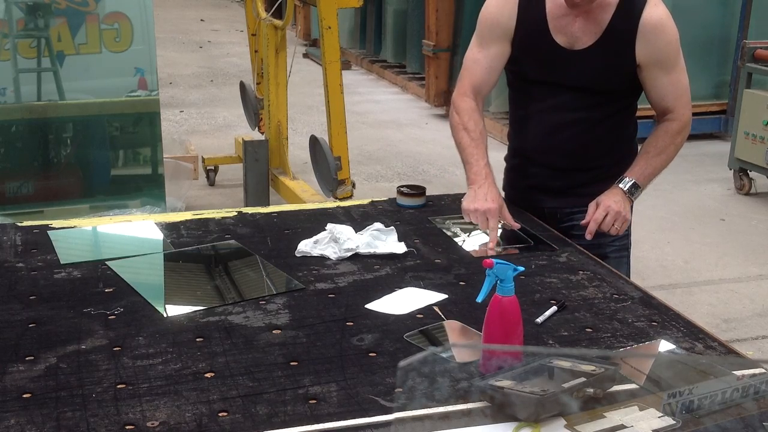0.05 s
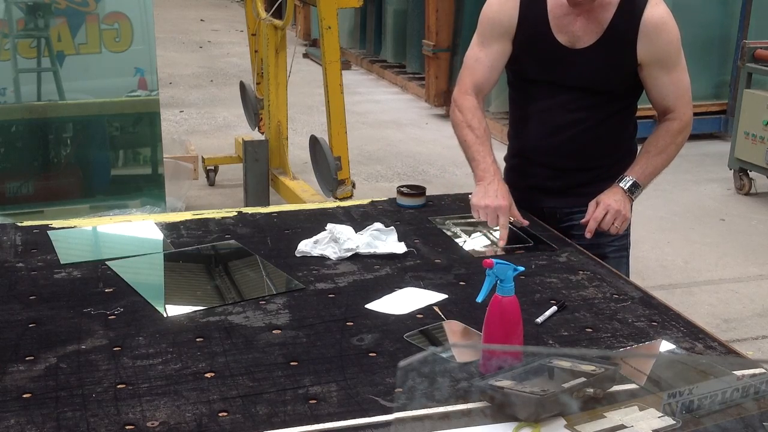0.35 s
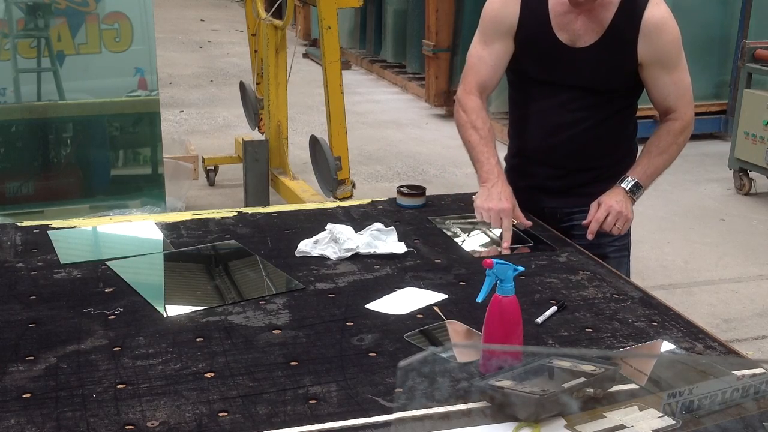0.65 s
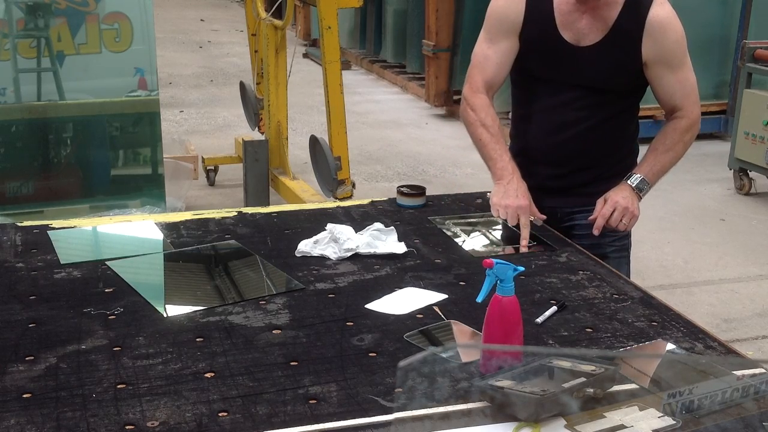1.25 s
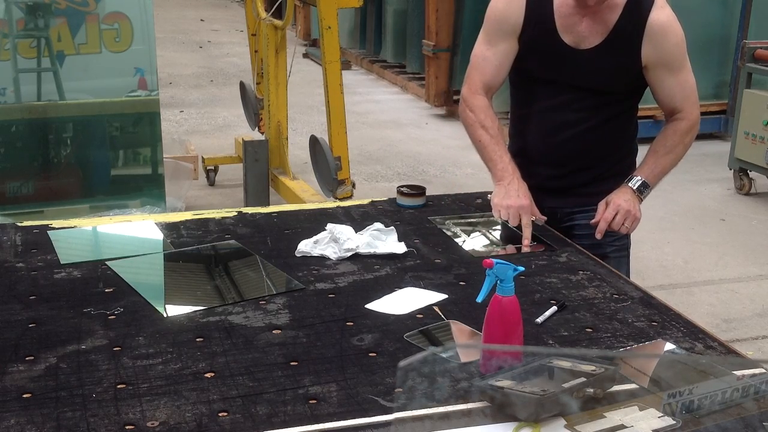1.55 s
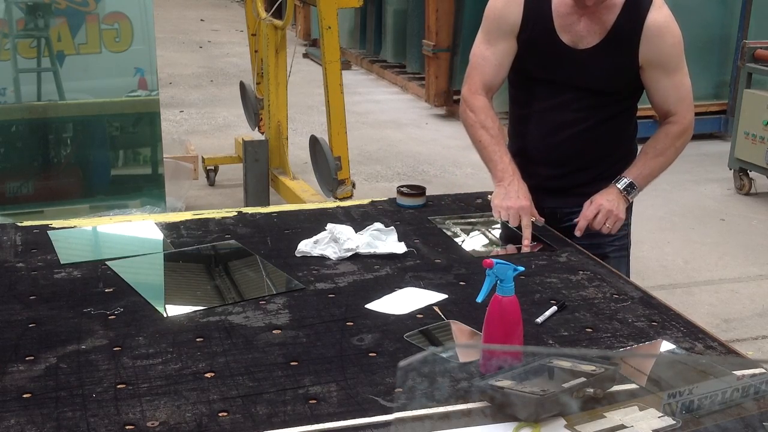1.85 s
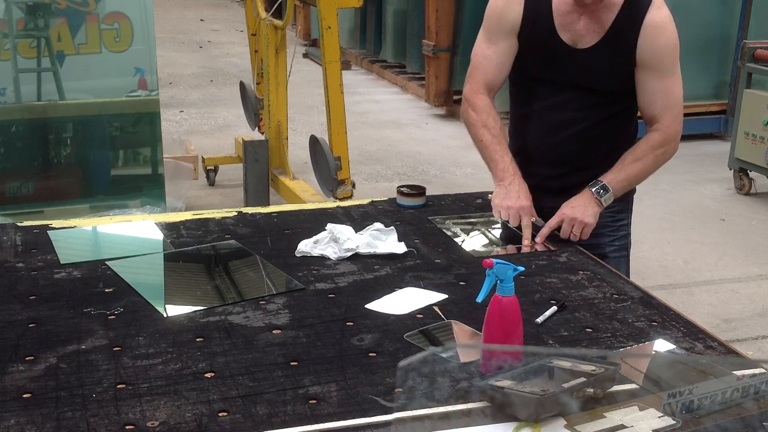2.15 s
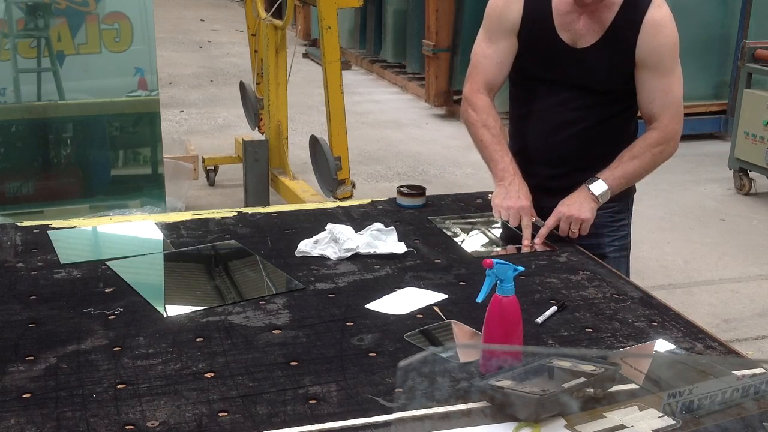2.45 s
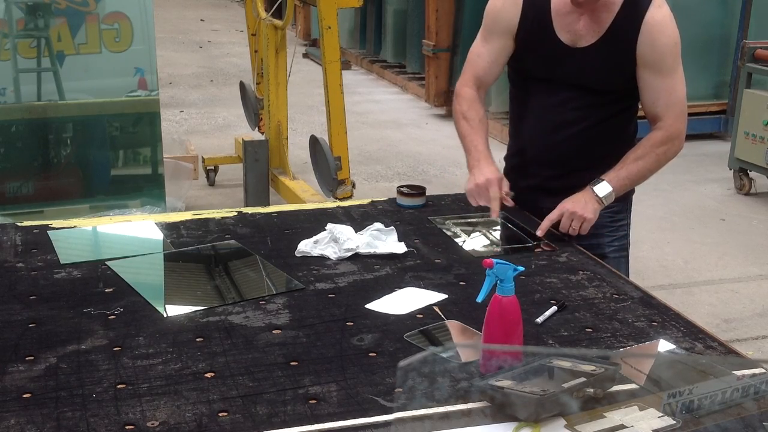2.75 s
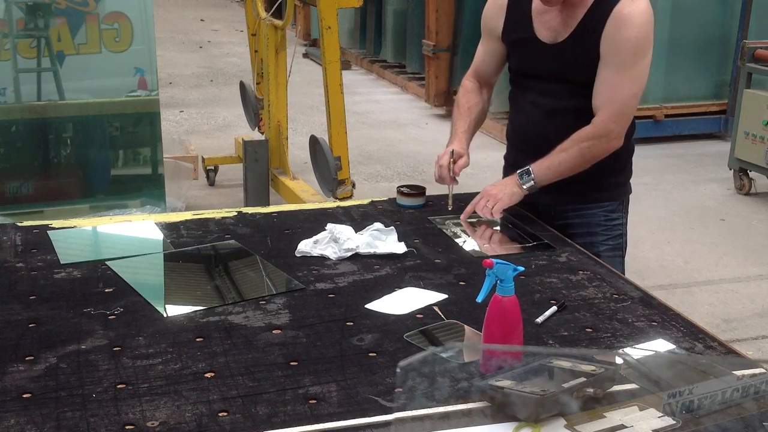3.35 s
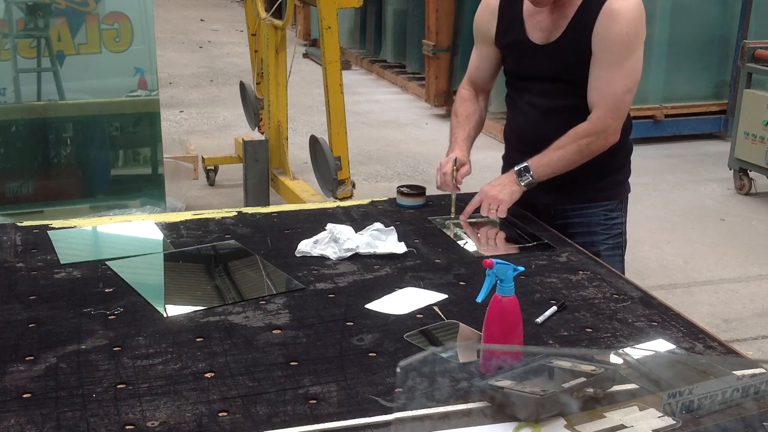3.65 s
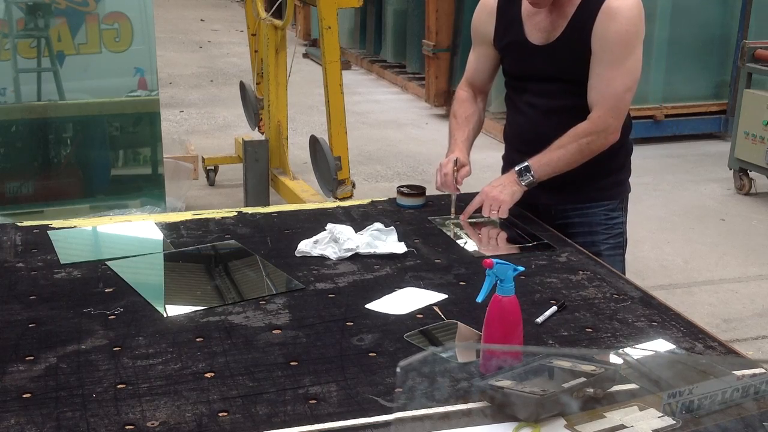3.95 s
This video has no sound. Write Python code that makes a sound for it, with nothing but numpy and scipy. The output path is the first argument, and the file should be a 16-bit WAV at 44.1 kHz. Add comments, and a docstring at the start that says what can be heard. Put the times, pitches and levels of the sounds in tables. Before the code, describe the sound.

Mirror glass snaps along its score, squeaks, then a sharp knock, in a humming workshop.

```python
"""A large, humming workshop: a scored mirror snaps on a padded bench.
Fingers tick on the glass and scrape it over grit. The crack rings the cloth-damped sheet and thumps
the bench; the freed strip squeals thinly as its edge rubs away. The steel cutter is set down, then
knocks. The hall answers each sound, over ventilation and two far motors."""
import sys
import numpy as np
from scipy import signal
from scipy.fft import rfft, irfft
from scipy.io import wavfile

SR = 44100
rng = np.random.default_rng(int(sys.argv[2]) if len(sys.argv) > 2 else 0)


def master_out(mix):
    """Clip the mix to full scale and print it as 16-bit PCM to the path in sys.argv[1]."""
    frames = np.transpose(np.atleast_2d(mix))
    ceiling = np.clip(frames, -1, 1)
    pcm = np.round(ceiling * 32767).astype(np.int16)
    wavfile.write(sys.argv[1], SR, pcm)


N = 176400


def undb(db):
    """Decibels to gain."""
    return 10 ** (np.asarray(db) / 20)


def unit_rms(x):
    """Scale to rms 1."""
    return x / np.sqrt(np.mean(x ** 2))


def decay(t, t60_s):
    """Exponential decay, 60 dB in t60_s."""
    return np.exp(-np.log(1000) * t / t60_s)


def at_hz(hz, table, column=1):
    """Table column interpolated over log frequency."""
    table = np.array(table)
    return np.interp(np.log(np.maximum(hz, 1)), np.log(table[:, 0]), table[:, column])


def noise(gain, size=N):
    """Noise of rms 1 with spectrum gain(Hz)."""
    f = np.fft.rfftfreq(size, 1 / SR)
    return unit_rms(irfft(rfft(rng.standard_normal(size)) * gain(f), size))


def drift(rate_hz):
    """Smooth random drift, rms 1."""
    return noise(lambda f: np.exp(-(f / rate_hz) ** 2) * (f > 0))


def bands(x, count=20):
    """Overlapping (centre Hz, band) pairs that sum to x."""
    centres_hz = np.geomspace(60, 16000, count)
    spectrum, f = rfft(x), np.fft.rfftfreq(len(x), 1 / SR)
    return [(hz, irfft(spectrum * at_hz(f, np.c_[centres_hz, weights]), len(x)))
            for hz, weights in zip(centres_hz, np.eye(count))]


def add(out, start_s, x):
    """Mix x into out at start_s."""
    i = int(start_s * SR)
    out[i:i + len(x)] += x[:N - i]


# air and machinery spectrum (frequency [Hz], relative density [dB])
AIR_SPECTRUM = [(18, -87), (30, -71), (59, -29.5), (92, -26), (113, -15.5), (132, -7.5), (154, -3),
                (171, -7), (185, -2), (205, -1), (234, 0.5), (253, -13), (281, -7), (364, -8.5),
                (437, -4.5), (511, -10), (662, -9), (815, -8.5), (928, -12), (1140, -15.5), (1370, -20),
                (1600, -18.5), (3070, -33), (8690, -37), (15000, -39)]
# drone resonances (frequency [Hz], half-width [Hz], mean level [dB])
DRONE_PEAKS = [(224.3, 7.3, -63.5), (294.3, 9.4, -69.5), (450.5, 14.6, -57), (657.5, 7.4, -61.5),
               (794, 24, -63.5)]
def ventilation(air_db=-49, split_hz=2000, rise_db_per_s=0.5):
    """Flickering air and a resonant drone swell slowly under steady hiss."""
    t = np.arange(N) / SR
    air_gain = lambda f: undb(at_hz(f, AIR_SPECTRUM))
    rush = sum(band * undb(0.5 * drift(30)) for hz, band in bands(noise(air_gain)) if hz < split_hz)
    hiss = sum(band for hz, band in bands(noise(air_gain)) if hz >= split_hz)
    drone = sum(undb(db) * noise(lambda f: 1 / (1 + ((f - hz) / width_hz) ** 2))
                for hz, width_hz, db in DRONE_PEAKS)
    swell = undb(-1.12 * drift(1.0) + rise_db_per_s * (t - t.mean()))
    return swell * (undb(air_db) * rush + drone) + undb(air_db) * hiss


# motor hum tracks (time [s], frequency [Hz], rms level [dB])
LOW_HUM = [(0, 145, -58), (1.1, 143, -60), (1.6, 142.9, -88), (2.0, 146, -58), (2.8, 146.1, -57.5),
           (3.17, 147.5, -61.5), (3.3, 145, -51), (3.65, 147, -48.5), (3.8, 148.2, -60),
           (3.92, 148.5, -46.5)]
HIGH_HUM = [(0, 199, -76), (.6, 196, -58.5), (1.2, 202.3, -84), (1.8, 205.2, -52.5), (2.25, 205, -65),
            (2.551, 206, -48), (2.85, 207, -55.5), (3.3, 210.9, -55.5), (3.65, 213, -59.5),
            (4, 213.5, -50.5)]
def motors(waver_hz=2.23, waver_db=3.04):
    """Two far motors hum, wavering in pitch and level."""
    t, out = np.arange(N) / SR, np.zeros(N)
    for track in (LOW_HUM, HIGH_HUM):
        times_s, hz, db = np.array(track).T
        phase = 2 * np.pi * np.cumsum(np.interp(t, times_s, hz) + waver_hz * drift(11.8)) / SR
        level_db = np.interp(t, times_s, db) + waver_db * drift(4.9)
        out += np.sqrt(2) * undb(level_db) * np.sin(phase)
    return out


# hall reverberation (frequency [Hz], relative level [dB], t60 [s])
HALL_BANDS = [(150, -24, 1.8), (300, 7.5, 1.8), (453.5, -10, 1.37), (1010, 2.5, 0.31), (2180, -7, 1.56),
              (4200, -2, 1.51), (6300, -3, 1.52), (8600, -4.5, 0.65), (10800, 4, 0.96), (15000, -7, 0.29)]
def hall(send, gap_s=0.021, build_s=0.012):
    """Echoes arrive after a gap, boosted at first by the ceiling; the top treble dies soonest."""
    t, out = np.arange(2 * SR) / SR, np.zeros(N)
    tail = sum(band * undb(at_hz(hz, HALL_BANDS)) * decay(t, at_hz(hz, HALL_BANDS, column=2))
               for hz, band in bands(rng.standard_normal(len(t))))
    ceiling = undb(-5) * decay(t, t60_s=0.062)
    tail *= np.minimum(t / build_s, 1) * (1 + ceiling)
    add(out, gap_s, signal.fftconvolve(send, tail) * undb(-2) / np.sqrt(SR / 10))
    return out


# grit spectrum (frequency [Hz], relative level [dB])
GRIT_SPECTRUM = [(1500, 2), (3500, -4), (4300, 1), (4900, 3.5), (5400, -5), (6200, 2), (7000, -7),
                 (7550, 2), (8300, 0), (9900, -5), (10800, -4), (15000, -13)]
# glass shifts (time [s], length [s], grit level [dB], singing mode [Hz], mode level [dB])
GLASS_SHIFTS = [(0.145, 0.1, -63.5, 9770, -73.5), (0.994, 0.13, -62.5, 10140, -76)]
def scrapes(grains_per_s=550, scatter_db=0.5, mode_width_hz=60):
    """The glass shifts on grit; dense tiny grains make one high mode sing."""
    t, f, out = np.arange(N) / SR, np.fft.rfftfreq(N, 1 / SR), np.zeros(N)
    hits = rng.random(N) < grains_per_s / SR
    grain_spectrum = rfft(hits * undb(scatter_db * rng.standard_normal(N)) * rng.choice([-1, 1], N))
    grit = unit_rms(irfft(grain_spectrum * undb(at_hz(f, GRIT_SPECTRUM)), N))
    for start_s, length_s, grit_db, mode_hz, mode_db in GLASS_SHIFTS:
        mode = unit_rms(irfft(grain_spectrum / (1 + 1j * (f - mode_hz) / mode_width_hz) ** 2, N))
        progress = np.clip((t - start_s) / length_s, 0, 1)
        envelope = np.sqrt(np.abs(np.sin(np.pi * progress)))
        out += (undb(grit_db) * grit + undb(mode_db) * mode) * envelope
    return out


# finger ticks (time [s], gain [dB], tilt [dB/octave])
FINGER_TICKS = [(0.145, -51.5, 0), (0.517, -51.5, 1), (0.754, -55, 3), (1.003, -52, 10), (1.068, -51, 8),
                (1.171, -48, 0.5)]
def ticks():
    """Light finger contacts ring the sheet briefly."""
    out = np.zeros(N)
    for start_s, db, tilt in FINGER_TICKS:
        add(out, start_s, undb(db) * glass(lambda f: tilt_db(f, tilt), t60_scale=0.65))
    return out


def ring(modes, t, t60_scale=1, colour_db=lambda hz: 0):
    """Sum of decaying modes at random phases."""
    return sum(undb(db + colour_db(hz)) * decay(t, t60_s * t60_scale)
               * np.sin(2 * np.pi * (hz * t + rng.random())) for hz, db, t60_s in modes)


# steel cutter modes (frequency [Hz], relative level [dB], t60 [s])
CUTTER_MODES = [(2300, -14, .007), (3200, -7, .007), (4330, -4, .014), (4635, -0.5, 0.017),
                (5090, -5, .018), (5370, -2.5, 0.017), (8650, -14, .03), (9350, -16, .018)]
# cutter contacts (time [s], gain [dB])
CUTTER_CONTACTS = [(3.5643, -36.5), (3.5669, -51)]
def cutter(attack_s=0.0003):
    """The steel cutter rings briefly on touching down and chatters once."""
    t, out = np.arange(SR // 4) / SR, np.zeros(N)
    for start_s, db in CUTTER_CONTACTS:
        add(out, start_s, undb(db) * np.minimum(t / attack_s, 1) * ring(CUTTER_MODES, t))
    return out


# edge squeals (peak time [s], frequency [Hz], level [dB], rise [s], fall [s],
# octave re fundamental [dB], waver [Hz])
EDGE_SQUEALS = [(2.643, 8062, -38.5, 0.035, 0.034, -32, 7.5), (2.66, 12750, -68, .03, .025, -32, 30),
                (2.705, 7896, -42, 0.012, 0.06, -32, 12.3), (2.71, 4640, -53.5, 0.041, 0.022, -32, 70),
                (2.745, 7868, -47, 0.026, .012, -32, 7.3), (2.755, 14100, -68, .025, .03, -32, 50),
                (2.775, 6185, -45.5, 0.017, 0.024, -13.5, 12.6),
                (2.785, 8058, -45.5, 0.045, 0.0071, -32, 7.7), (2.82, 6235, -52, 0.023, 0.055, -28, 31),
                (3.04, 6200, -59, 0.039, 0.013, -32, 26)]
def squeals(roughness_db=1.7):
    """Friction along the fresh edge swells one high mode after another."""
    t, out = np.arange(N) / SR, np.zeros(N)
    for peak_s, hz, db, rise_s, fall_s, octave_db, waver_hz in EDGE_SQUEALS:
        swell = np.exp(-0.5 * ((t - peak_s) / np.where(t < peak_s, rise_s, fall_s)) ** 2)
        phase = 2 * np.pi * np.cumsum(hz + waver_hz * drift(58)) / SR
        octave = undb(octave_db) * np.sin(2 * phase) * (2 * hz < SR / 2)
        out += undb(db + roughness_db * drift(150)) * swell * (np.sin(phase) + octave)
    return out


# bench top modes (frequency [Hz], relative level [dB], t60 [s])
BENCH_MODES = [(147, -29, 0.035), (242, -10, 0.08), (334, -5.5, 0.083), (373, 0.5, 0.06), (506, -11, 0.025),
               (664, -15, 0.027), (820, -23, 0.016), (1076, -23, 0.092), (1270, -22, 0.033)]
def bench(attack_s=0.0034, low_cut_hz=145):
    """The bench top thumps under the sheet; it radiates no deep bass."""
    t = np.arange(SR // 4) / SR
    thump = np.minimum(t / attack_s, 1) * ring(BENCH_MODES, t)
    return signal.sosfilt(signal.butter(4, low_cut_hz, "high", fs=SR, output="sos"), thump)


# crack spectrum sent into the hall (frequency [Hz], relative level [dB])
RADIATED_SPECTRUM = [(40, -49), (150, -11), (500, -2), (1200, -4), (1750, -4.5), (2400, -8), (3300, -5),
                     (4200, -0.5), (5100, -3), (6200, -2), (7000, -4.5), (8200, -2), (9800, -6),
                     (11500, -9), (15000, -17)]
def radiated_crack(colour_db, size=2048):
    """The crack summed over all directions: a broad click in which single modes merge."""
    f = np.fft.rfftfreq(size, 1 / SR)
    gain = undb(at_hz(f, RADIATED_SPECTRUM) + colour_db(f + 1) + 23)
    cepstrum = irfft(np.log(gain))
    minimum_phase_window = np.r_[1, np.full(size // 2 - 1, 2), np.zeros(size // 2)]
    return irfft(np.exp(rfft(cepstrum * minimum_phase_window)))


# cloth-damped sheet modes (frequency [Hz], relative level [dB], base t60 [s])
SHEET_MODES = [(1667, -17, 0.044), (1870, -21, .025), (4270, -18, 0.031), (4556, -5.5, 0.027),
               (5084, 4, 0.0051), (5930, -9, 0.0074), (6150, -0.5, 0.014), (6800, -3, 0.012),
               (7450, -2, 0.013), (8600, -10, 0.019), (10100, -16, 0.025), (11400, -16, 0.014)]
# direct crack spectrum (frequency [Hz], relative level [dB])
CRACK_SPECTRUM = [(40, -44), (85, -25), (150, -16), (500, 9.5), (1200, -8.5), (1800, -4), (2500, -12),
                  (3300, -6), (4400, 4), (6300, -8), (8800, -1.5), (11500, -15), (15000, -19)]
def glass(colour_db, t60_scale, attack_s=0.0012):
    """A short crack rings the sheet and scatters off things on the bench."""
    t = np.arange(SR // 4) / SR
    burst = noise(lambda f: undb(at_hz(f, CRACK_SPECTRUM) + colour_db(f + 1)), size=len(t))
    crack = burst * undb(-1.5) * decay(t, 0.013 * t60_scale)
    scatter = burst * undb(-16) * decay(t, t60_s=0.11)
    modes = ring(SHEET_MODES, t, t60_scale, colour_db)
    return np.minimum(t / attack_s, 1) ** 2 * (modes + crack + scatter)


def tilt_db(hz, db_per_octave):
    """Spectral slope about the sheet's middle mode."""
    pivot_hz = SHEET_MODES[len(SHEET_MODES) // 2][0]
    return db_per_octave * np.log2(hz / pivot_hz)


# snap, cutter set down, cutter knock (time [s], glass gain [dB], bench gain [dB], bench lag [s],
# tilt [dB/octave], t60 scale [ratio], hall send [dB], favoured frequency [Hz], boost [dB])
SHEET_BLOWS = [(2.4859, -20, -42, 0.0064, 1, 1.14, 2.5, 1900, 8),
               (3.5640, -39, -45, 0.0053, -1, 0.93, 7, 4850, 6),
               (3.9326, -13, -19.5, 0.00035, 0.4, 0.76, 2, 5970, 7)]
def blows(favoured_width_octaves=0.13):
    """Blows ring sheet and bench; the contact point favours some modes. Returns (direct, hall send)."""
    direct, send = np.zeros(N), np.zeros(N)
    for start_s, glass_db, bench_db, lag_s, tilt, t60_scale, send_db, hz, boost_db in SHEET_BLOWS:
        favoured_db = lambda f: boost_db * np.exp(-(np.log2(f / hz) / favoured_width_octaves) ** 2)
        sheet = undb(glass_db) * glass(lambda f: tilt_db(f, tilt) + favoured_db(f), t60_scale)
        thump = undb(bench_db) * bench()
        click = undb(glass_db) * radiated_crack(lambda f: tilt_db(f, tilt) + 0.41 * favoured_db(f))
        add(direct, start_s, sheet)
        add(direct, start_s + lag_s, thump)
        add(send, start_s, undb(send_db) * click)
        add(send, start_s, undb(send_db - 16) * sheet)
        add(send, start_s + lag_s, undb(send_db) * thump)
    return direct, send


def scene():
    """Workshop hum, blows, handling, squeals and cutter, with hall echoes; mono."""
    background = ventilation() + motors()
    impacts, send = blows()
    handling = scrapes() + ticks()
    squeal, steel = squeals(), cutter()
    send += handling + undb(2.5) * squeal + undb(-7) * steel
    return (background + impacts + handling + squeal + steel + hall(send))[None]


def record(dry, top_hz=15300):
    """Steep low-pass on the top treble."""
    return signal.sosfilt(signal.ellip(10, 0.2, 70, top_hz, fs=SR, output="sos"), dry)


dry = scene()
out = record(dry)
master_out(out)
```